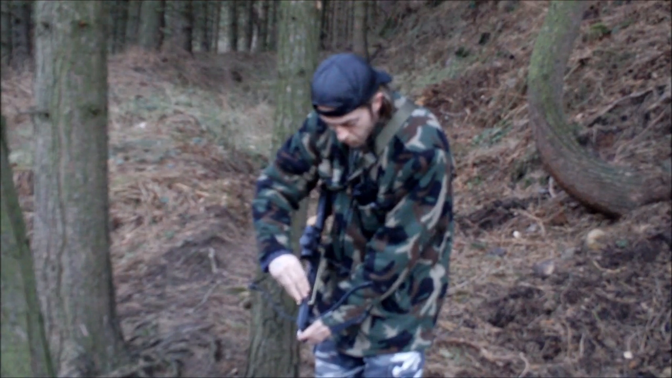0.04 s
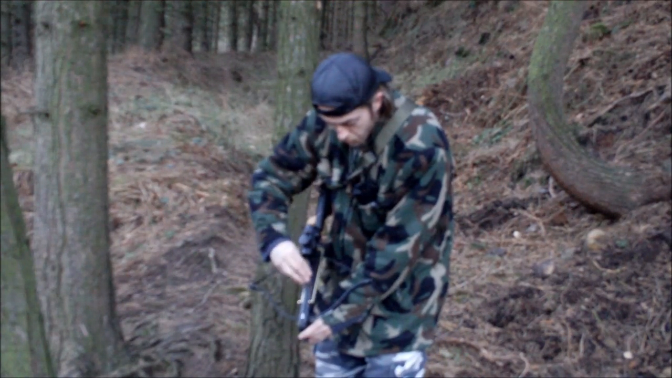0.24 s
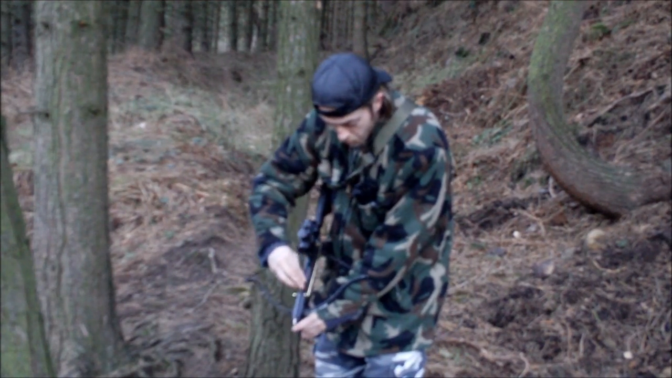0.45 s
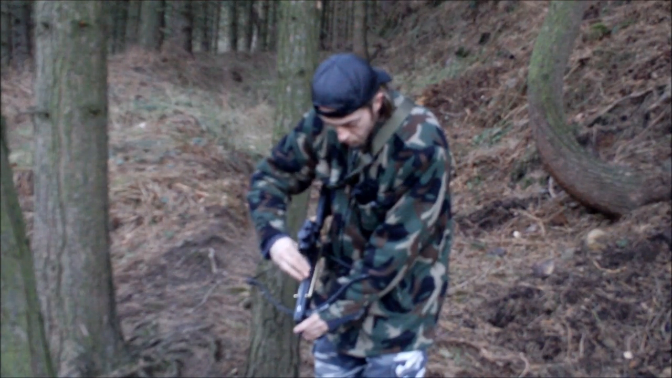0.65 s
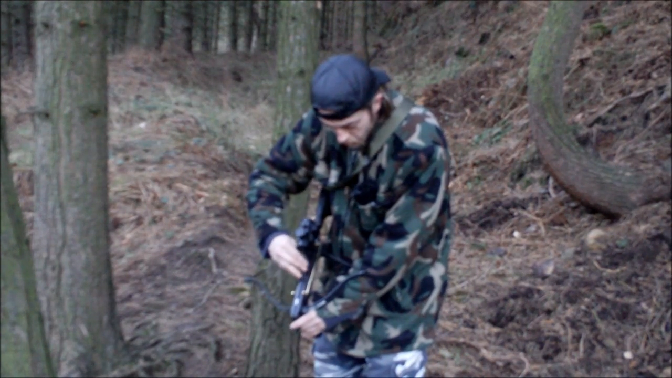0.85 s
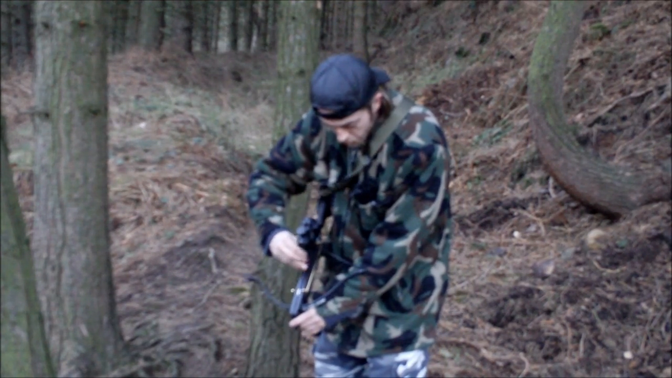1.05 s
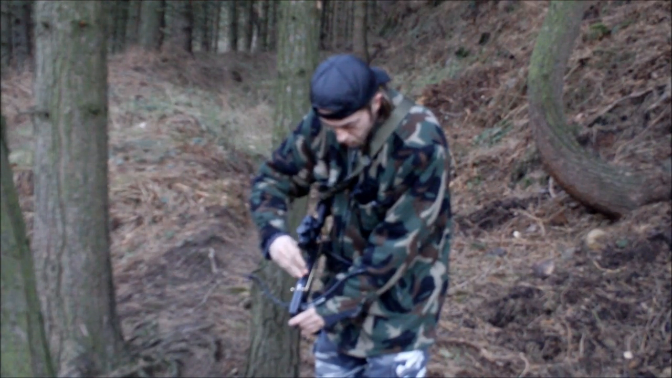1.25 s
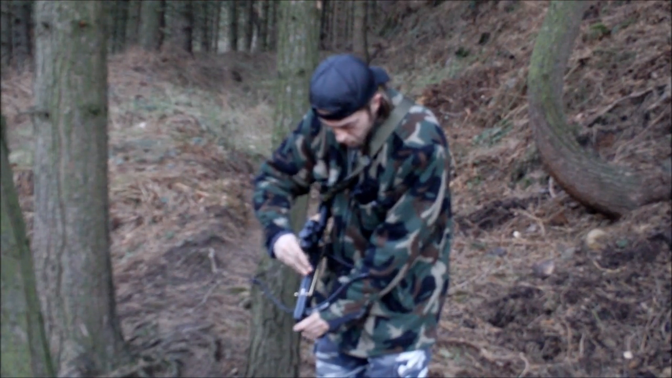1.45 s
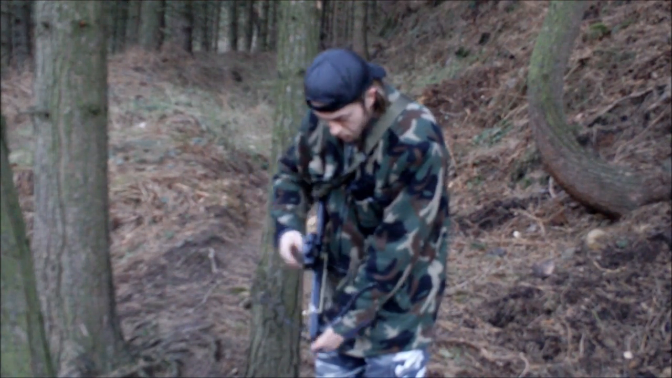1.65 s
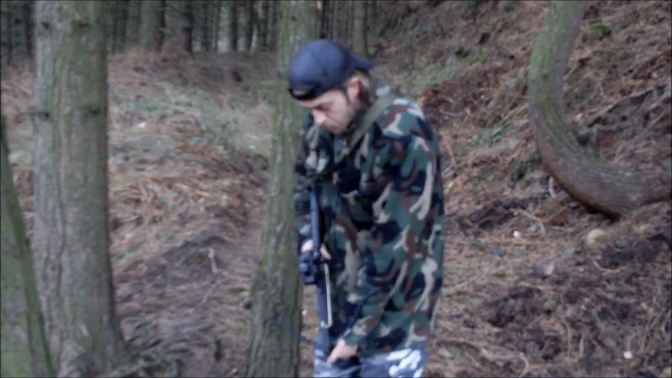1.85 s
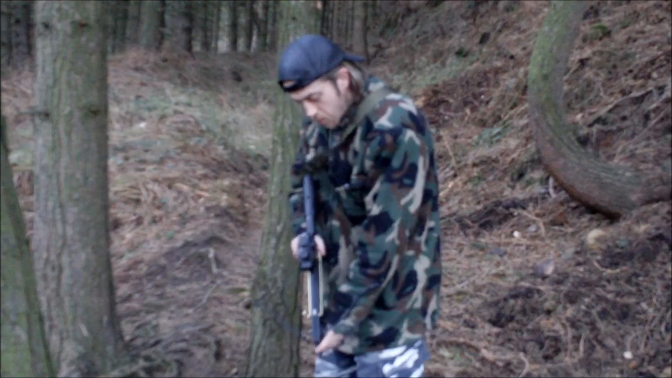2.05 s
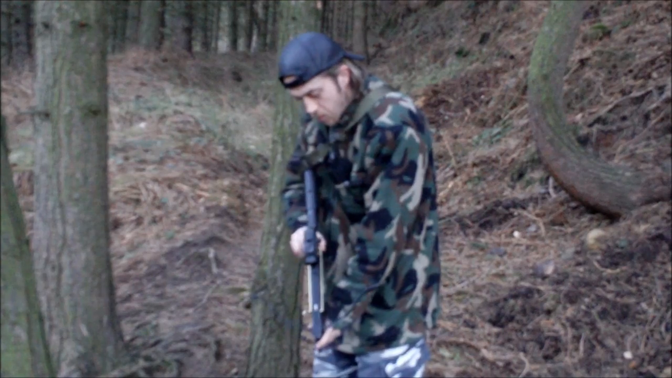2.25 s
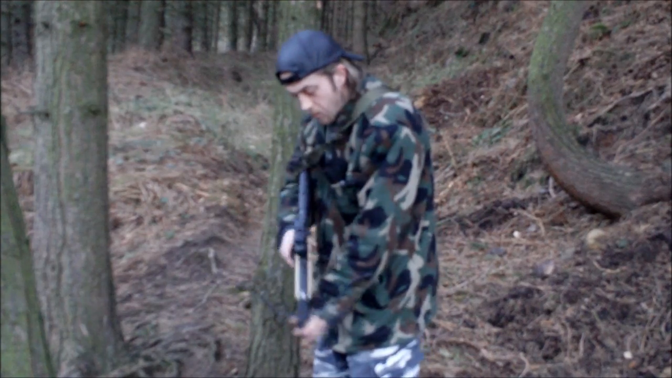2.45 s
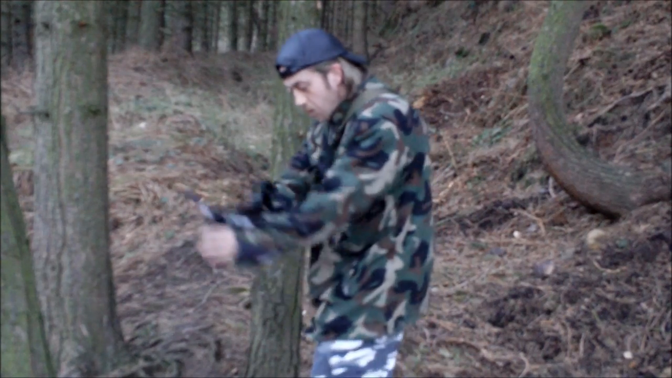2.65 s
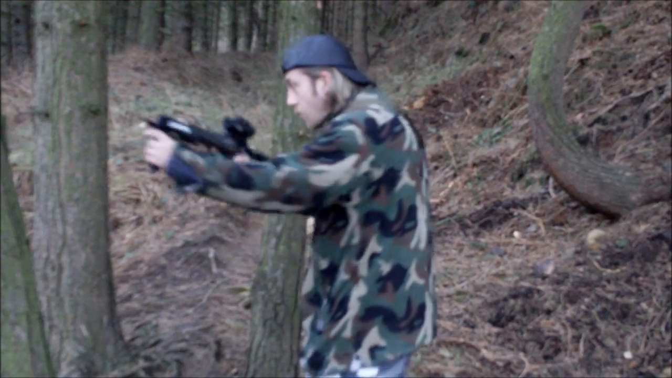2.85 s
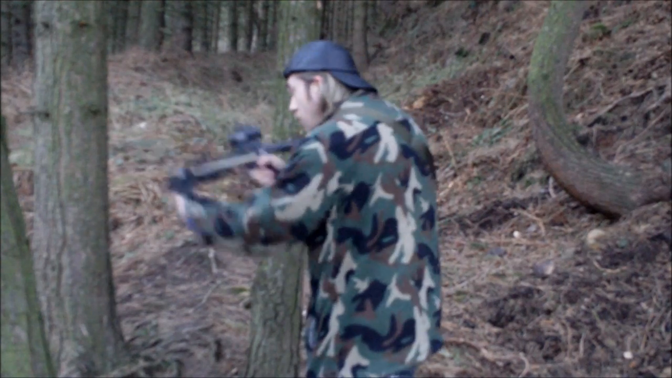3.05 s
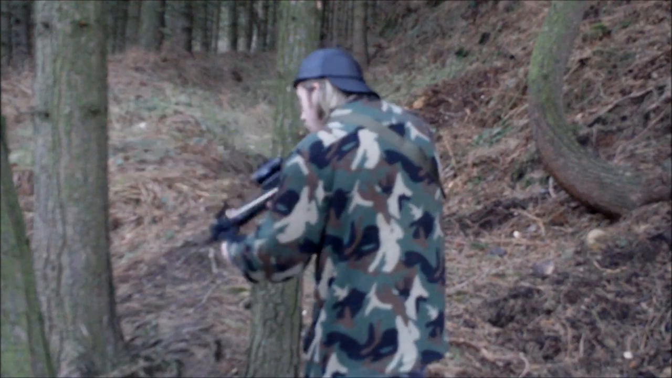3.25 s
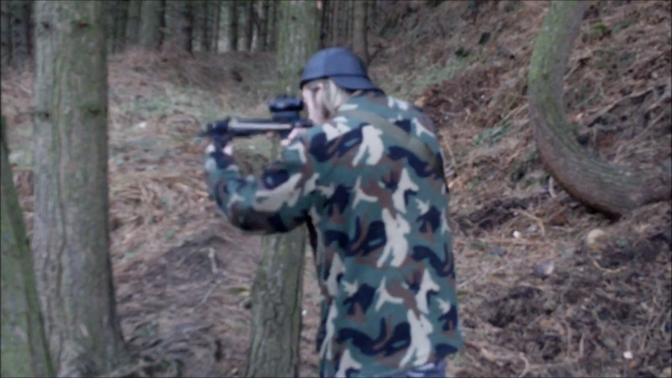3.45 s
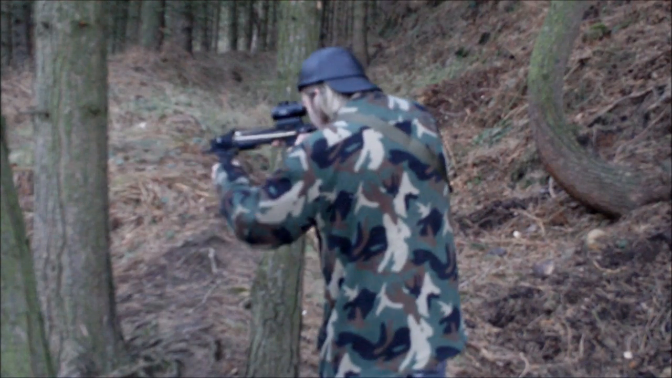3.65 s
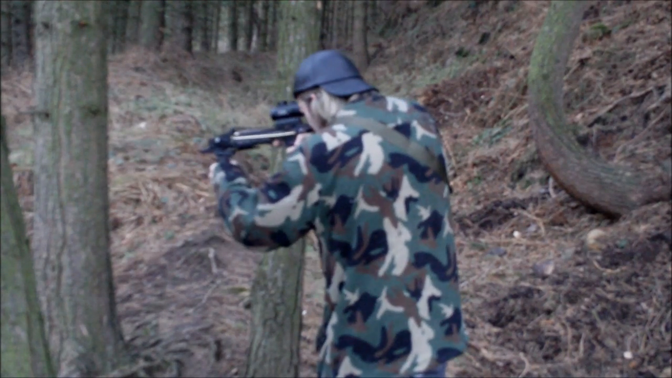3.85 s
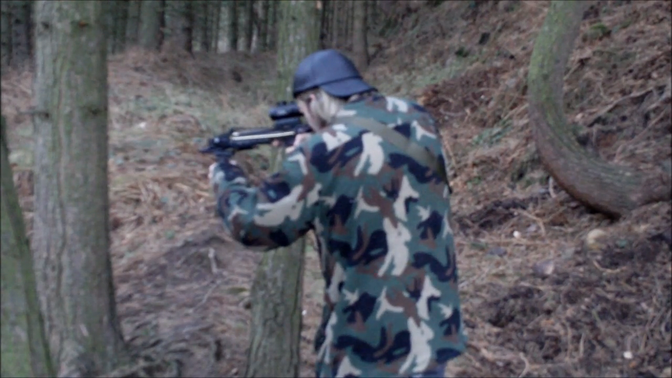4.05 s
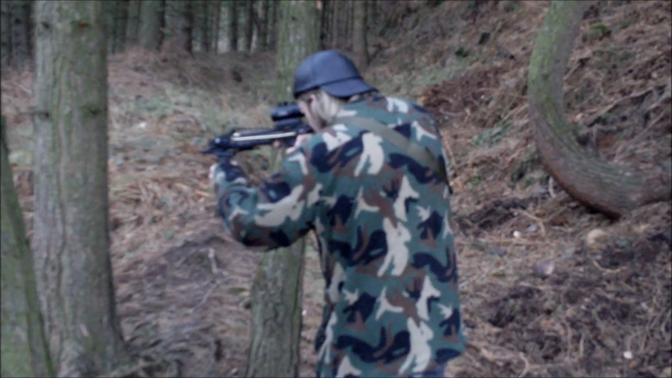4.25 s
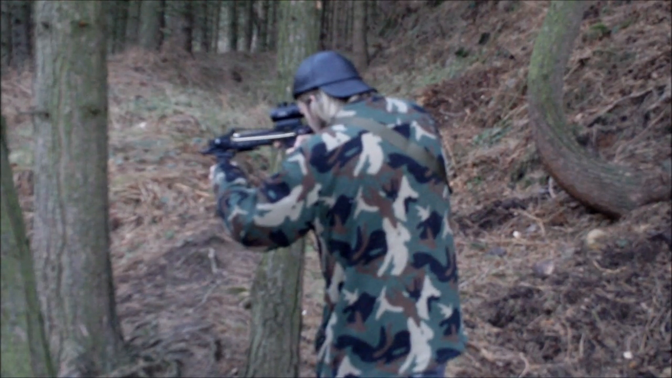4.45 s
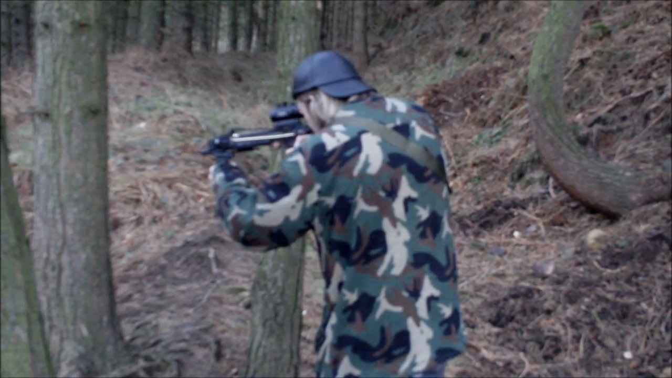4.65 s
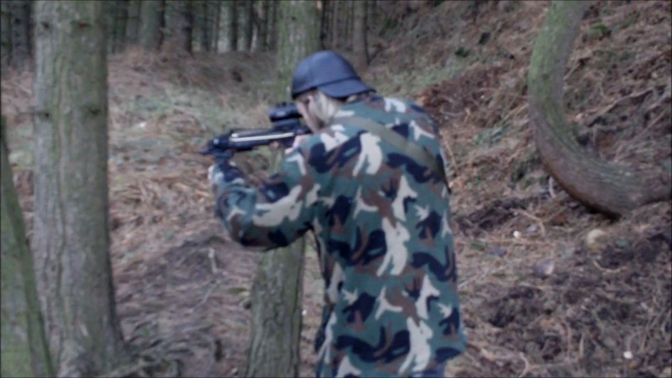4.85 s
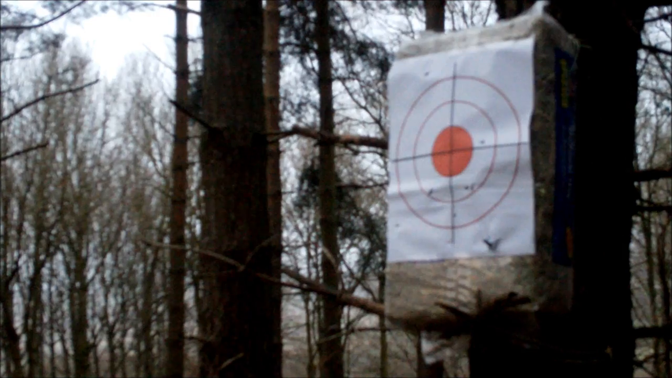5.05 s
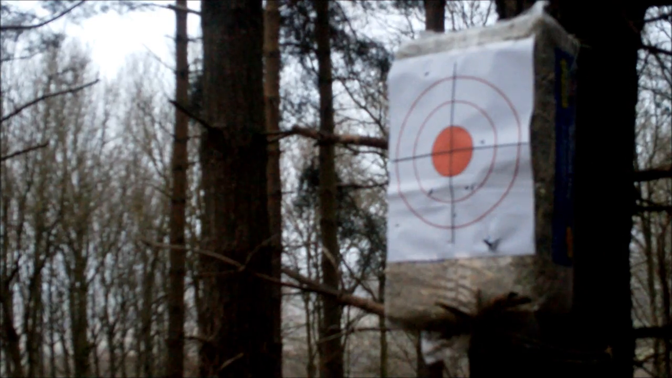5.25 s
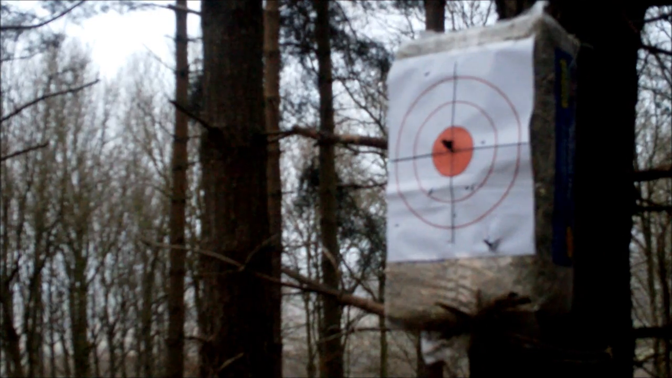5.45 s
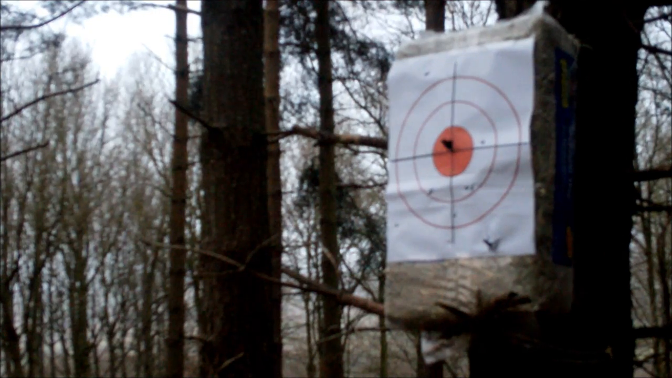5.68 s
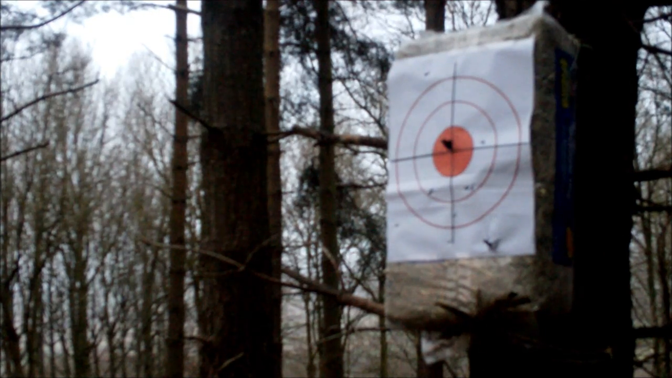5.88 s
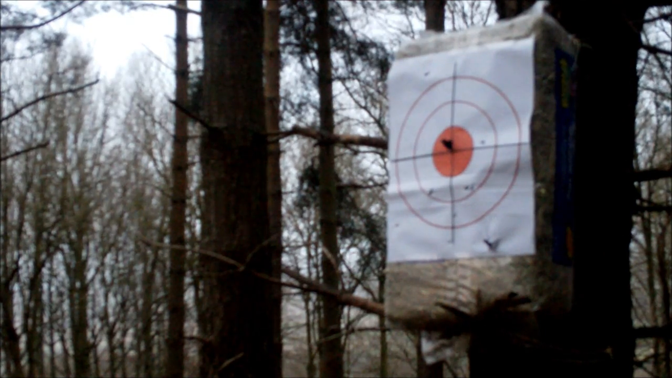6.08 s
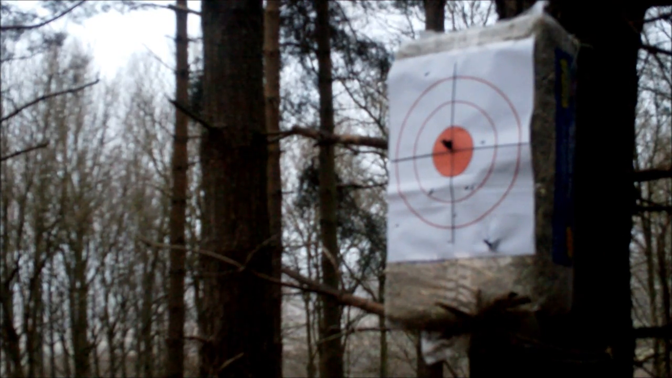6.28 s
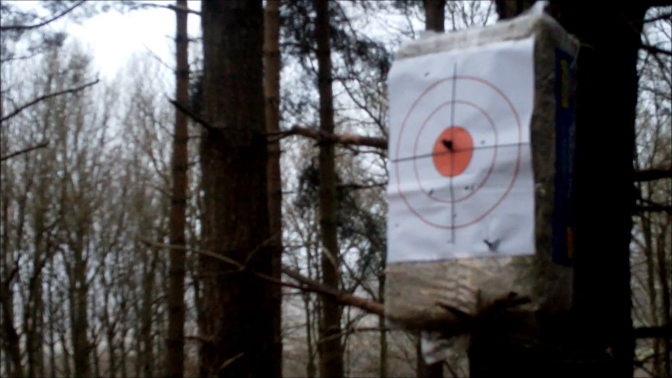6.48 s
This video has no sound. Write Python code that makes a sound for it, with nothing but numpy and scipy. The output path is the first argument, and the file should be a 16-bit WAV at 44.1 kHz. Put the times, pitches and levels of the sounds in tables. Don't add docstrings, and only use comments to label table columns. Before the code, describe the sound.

Soft, steady forest air is heard from a nearby camera microphone. From 0 to 2.6 seconds a crossbow bolt is loaded: light jittering taps at the start, scattered metallic ticks, and short rubs along the groove around 1.0 and 1.6-1.95, with a clearer clink at 2.17. Faint regular focus-motor ticks sit on the right until 1.1, returning at 2.3 and 3.1-3.6. At 2.8-3.0 the jacket rustles and the stock knocks, strongest at 2.9; a small movement follows at 3.3. Near-silence holds until 4.85, when trigger click and string slap burst together with ringing limbs and forest echo. At 4.95 the scene cuts to the target's low drone and hiss. The delayed snap rolls in at 5.0; at 5.29 the bolt smacks papered foam, loud and dry, with a brief rattle and echoes. The background ducks, then slowly recovers as low wind flutters to 6.5.

```python
import sys
import numpy as np
from scipy import signal
from scipy.fft import rfft, irfft, next_fast_len
from scipy.io import wavfile
from scipy.ndimage import uniform_filter1d

SR = 44100
rng = np.random.default_rng(int(sys.argv[2]) if len(sys.argv) > 2 else 0)


def bounce(signal):
    frames = np.transpose(np.atleast_2d(signal))
    limited = np.clip(frames, -1, 1)
    pcm = np.round(limited * 32767).astype(np.int16)
    wavfile.write(sys.argv[1], SR, pcm)


def volts(x):
    e = np.asarray(x, float) / 20
    return 10 ** e


N = 287532
TRAVEL_S = 0.1472

# start_s, level_db, rise_s, length_factor, ring_db
SHOT = [
    (4.845, -24.5, 0.00071, 0.27, -1),
    (4.85, -16, 0.00022, 0.23, 1.5),
    (4.8542, -20, 0.0005, 1.32, -12),
]
# time_s, level_db, contact_ms
SMACK = [
    (5.29047, -8.5, .075),
    (5.2908, -6.5, .075),
    (5.29127, -8.5, .065),
    (5.2928, -20, .15),
]


def unit(x):
    return x / np.sqrt(np.mean(x ** 2) + 1e-20)


def panned(db):
    return volts([[db / 2], [-db / 2]])


def along(points, hz):
    f, v = np.transpose(points)
    return np.interp(np.log(hz + 1), np.log(f + 1), v)


def add(track, s, sound):
    part = track[..., round(s * SR):][..., :sound.shape[-1]]
    part += sound[..., :part.shape[-1]]


def filtered(x, response):
    m = next_fast_len(x.shape[-1] + 8192)
    spectrum = rfft(x, m) * response(np.fft.rfftfreq(m, 1 / SR))
    return irfft(spectrum, m)[..., :x.shape[-1]]


def body(peaks, widen):
    def response(f):
        total = 0
        for k, (centre, width, db) in enumerate(peaks):
            damping = 1j * f * width * widen
            total = total + (-1) ** k * volts(db) * damping / (centre * centre - f * f + damping)
        return total
    return response


def causal(spectrum):
    def response(hz):
        cep = irfft(np.log(volts(along(spectrum, hz)) + 1e-6))
        cep[1:len(cep) // 2] *= 2
        cep[len(cep) // 2 + 1:] = 0
        return np.exp(rfft(cep))
    return response


def port(x):
    low = signal.butter(2, 250, "high", fs=SR, output="sos")
    high = signal.butter(4, 9600, fs=SR, output="sos")
    return signal.sosfilt(np.vstack([low, high]), x)


def ping(hz, t60, attack):
    t = np.arange(SR // 6) / SR
    return np.sin(2 * np.pi * hz * t) * volts(-60 * t / t60) * (1 - np.exp(-t / attack))


def dying(t60s, seconds, channels=1):
    noise = rng.standard_normal((channels, int(seconds * SR)))
    hz, t, z = signal.stft(noise, SR, nperseg=128)
    fade = volts(-60 * t / along(t60s, hz)[:, None])
    tail = signal.istft(z * fade, SR, nperseg=128)[1]
    return tail / np.linalg.norm(tail[0])


def grit(per_s, spread_db):
    when, size, sign = rng.random((3, N))
    strength = volts(-spread_db * np.log(size + 0.06))
    return unit((when < per_s / SR) * strength * (sign - 0.5))


def slips(count, centre_hz, spread, cycles):
    when = rng.random(count)
    pitch = rng.standard_normal((count, 1))
    size = np.minimum(rng.exponential(size=(count, 1)), 2.5)
    hz, k = centre_hz * np.exp(spread * pitch), np.arange(320)
    rings = volts(4 * size - 60 * k / SR * hz / cycles) * np.sin(2 * np.pi * hz * k / SR)
    places = (when * N).astype(int)[:, None] + k
    return unit(np.bincount(places.ravel(), rings.ravel())[:N])


def strokes(rows, rise_db, fall_db_per_s):
    t = np.arange(N) / SR
    start, attack, hold, db = np.transpose(rows)[..., None]
    rising = rise_db * (start + attack - t) / attack
    falling = fall_db_per_s * (t - start - attack - hold)
    below = np.maximum(rising, falling)
    return volts((db - np.clip(below, 0, 120)).max(axis=0))


def rush(spectrum, alike, patchy_db):
    z = signal.stft(rng.standard_normal((2, N)), nperseg=512)[2]
    patches = rng.standard_normal(z.shape[1:])
    patches = uniform_filter1d(uniform_filter1d(patches, 6, 0), 10, 1)
    pair = signal.istft(z * volts(patchy_db * unit(patches)), nperseg=512)[1][:, :N]

    def mid_side(hz):
        turn = np.arccos(np.clip(along(alike, hz), -1, 1)) / 2
        return volts(along(spectrum, hz)) * [np.cos(turn), np.sin(turn)]
    mid, side = filtered(pair, mid_side)
    return unit(np.array([mid + side, mid - side]))


def forest(x, near_db):
    trees = [(300, 0.47), (2000, 0.83), (8000, 0.43), (14000, 0.33)]  # pitch_hz, t60_s
    ahead, around = dying(trees, 1.0, channels=2)
    swell = 1 + volts(near_db - 60 * np.arange(len(ahead)) / SR / 0.17)
    ahead, around = ahead * swell, around * swell
    left, right = ahead + 0.052 * around, ahead - 0.11 * around
    return signal.fftconvolve(x[None], [left, right], axes=1)[:, :N]


def hush():
    hush_near = [(18, -64), (30, -34), (81, -23.5), (266, -7), (345, -3.5), (415, -2.5), (937, 0),
                 (1500, -1), (2350, -2.5), (4780, -8), (6900, -14), (8300, -11), (12300, -26), (16000, -52)]
    alike_near = [(60, 1.0), (240, 0.98), (950, 0.96), (3770, 0.8), (15000, 0.82)]  # pitch_hz, left-right likeness (0 to 1)
    return volts(-60.5) * rush(hush_near, alike_near, patchy_db=0.9)


def gain_control():
    open_db_per_s, duck_db, duck_s, recover_db_per_s = 11, 9.5, 0.14, 4
    since = np.arange(N) / SR - SMACK[0][0]
    after = np.maximum(since, 0)
    opening = open_db_per_s * np.minimum(since + 0.15, 0)
    return opening - duck_db * np.clip(after / duck_s, 0, 1) + recover_db_per_s * after


def target_air():
    drone = [(18, -57.5), (30, -23), (75, -18.5), (178, -8.5), (350, -5.5), (476, -6), (731, 0.5),
             (1440, -3.5), (1690, -7.5), (4000, -22.5), (5200, -54), (8800, -120)]
    hiss = [(1180, -31), (2000, -4.5), (2380, -11), (3680, -14.5), (4770, -14), (7190, -20), (8050, -17),
            (12200, -31.5), (13200, -50), (16000, -48)]
    gain_db = gain_control()
    low = volts(-53.5 + gain_db) * rush(drone, [(300, 0.94), (2000, 0.99)], patchy_db=1.0)
    high = volts(-64.5 + gain_db) * rush(hiss, [(3000, 0.7), (9000, 0.9)], patchy_db=-1.0)
    return low + high


def gusts():
    # time_s, level_db, pitch_hz
    thumps = [(5.1565, -44, 322), (5.1675, -38, 283.3), (5.3702, -47, 419), (5.4385, -41.5, 324),
              (5.4454, -46, 387), (5.61, -46, 333), (5.66, -41, 286), (5.6718, -38, 581), (5.682, -45, 320),
              (5.724, -49, 549), (5.871, -40, 329), (5.876, -43.5, 342), (5.9212, -43, 367),
              (5.9475, -49.5, 298), (5.959, -41, 452), (6.0464, -43, 318), (6.0728, -49, 333),
              (6.1456, -46, 590), (6.15, -38.5, 419), (6.1661, -45.5, 290), (6.2371, -46, 516),
              (6.2448, -43, 385), (6.2539, -37.5, 457), (6.269, -34, 520), (6.5021, -31, 323),
              (6.5175, -45, 387)]
    # start_s, attack_s, hold_s, level_db
    swells = [(5.02, 0.13, .01, -53), (5.33, 0.16, 0.0091, -58), (5.5, 0.2, 0.0058, -48.5),
              (5.74, 0.13, .015, -49.5), (6.02, 0.031, 0.032, -51), (6.1, 0.17, .015, -49.5),
              (6.46, 0.047, .02, -46)]
    rumble = [(30, -47), (100, -4.5), (250, 6), (450, 0), (900, -10.5), (2500, -66), (6000, -120)]  # pitch_hz, level_db (per Hz)
    out, t = np.zeros(N), np.arange(-600, 600) / SR
    for s, db, hz in thumps:
        phase = 2 * np.pi * rng.random(2)[:, None]
        bump = np.exp(-(t * hz / np.where(t < 0, 0.55, 0.9)) ** 2)
        eddy = np.cos(2 * np.pi * hz * t * [[1], [2.1]] + phase) * bump
        add(out, s - 600 / SR, volts(db - 3.5) * (eddy[0] + 0.35 * eddy[1]))
    lumps = unit(filtered(grit(350, 4.6), causal(rumble)))
    return out + volts(-6.5) * strokes(swells, rise_db=16.5, fall_db_per_s=400) * lumps


def focus():
    steps = [(0.095, -37.5), (0.23, -37.5), (0.3693, -37), (0.5065, -36.5), (0.6455, -34.5), (0.7857, -34),
             (0.9251, -32.5), (1.071, -33.5), (2.315, -34), (3.061, -34.5), (3.1981, -34), (3.3346, -36),
             (3.4745, -33), (3.613, -34)]
    out, t = np.zeros(N), np.arange(-10, SR // 200) / SR
    push = np.exp(-(t / np.where(t < 0, 0.00006, 0.00013)) ** 2)
    rebound = np.exp(-((t - 0.00055) / 0.00044) ** 2)
    tick = push - rebound * push.sum() / rebound.sum()
    for s, db in steps:
        add(out, s - 10 / SR, volts(db - 0.7) * tick)
    return out * volts([[-20.5], [0]])


def loading():
    # time_s, peak_db, ring_hz, treble_db, t60_s
    ticks = [(0.0098, -39.5, 3100, 7, 0.016), (0.2995, -43, 1930, -31, 0.034), (0.3, -48, 2700, -31, 0.013),
             (0.634, -52, 2630, -1.5, 0.04), (0.7305, -41, 2215, -30, 0.04),
             (0.7345, -47, 2300, -30, 0.027), (0.7365, -48, 3350, -30, .02), (0.74, -47, 1870, -30, .03),
             (0.8556, -49.5, 2350, -17, 0.055), (1.0415, -44, 3730, -13, .03), (1.054, -45, 2000, -16, .05),
             (1.6268, -38, 1920, -36, 0.023), (1.6272, -59, 3010, -30, 0.018),
             (1.6552, -44, 2000, -30, .05), (1.667, -47, 1360, -30, 0.068), (1.735, -46, 2140, -20, .04),
             (1.766, -48, 2800, -17, .017), (1.8894, -44.5, 5300, -8, 0.014),
             (1.8896, -42.5, 2080, -13, 0.083), (1.8918, -43, 3500, -17, .02),
             (1.8975, -49, 3000, -20, .015), (1.9101, -39, 2920, -17, 0.0089),
             (1.9124, -41, 2430, -30, .04), (1.9128, -46, 3100, -30, 0.022), (1.92, -49, 3270, -30, 0.018),
             (1.9266, -38, 2450, -40, 0.0083), (1.929, -47, 2070, -40, 0.037),
             (2.0355, -39, 2260, -22, 0.017), (2.0358, -46, 3680, -26, 0.064),
             (2.1035, -50.5, 2660, 3, .02), (2.168, -33, 2645, -12, 0.027), (2.1704, -30, 2610, -23, 0.019),
             (2.3624, -46, 2900, -28, .02), (2.3635, -44, 1970, -28, 0.019),
             (2.5608, -49.5, 2800, -13, 0.044), (2.9125, -51, 5500, -20, .012),
             (2.919, -39.5, 3100, -30, 0.012), (3.0272, -46, 4660, -14, 0.004),
             (3.0276, -49, 3200, -30, .006)]
    # time_s, peak_db
    drops = [(0.008, -48), (0.021, -44), (0.0298, -47), (0.0378, -48), (0.0518, -49.5), (0.063, -53)]
    # time_s, left_minus_right_db
    bearing = [(0, 4.5), (.65, 2), (1.63, 0), (1.92, -0.3), (2.56, 2), (2.92, 6)]
    # start_s, attack_s, hold_s, level_db
    slide = [(0, .001, .065, -75), (1.0, 0.042, .012, -59.5), (1.59, 0.07, 0.078, -57),
             (1.84, 0.065, 0.033, -56), (1.93, 0.016, 0.023, -58.5)]
    # pitch_hz, width_hz, level_db
    bolt, rail, groove = [(1970, 300, -5), (2550, 130, 7.5), (3100, 530, 8.5), (3860, 280, -3),
                          (4450, 580, -4.5)], [(4500, 350, -19), (5600, 770, -6.5), (8500, 1400, -0.5),
                                        (10000, 1900, 0)], [(1275, 43, 4), (1950, 192, -0.5), (2420, 112, 0.5),
                                                      (3010, 110, 2), (4060, 280, -14)]
    out, t = np.zeros((2, N)), np.arange(SR // 10) / SR
    jitter = [(s, db, 2960, 2, 0.013) for s, db in drops]
    for s, db, hz, treble_db, t60 in jitter + ticks:
        pan_db = np.interp(s, *np.transpose(bearing))
        chatter = rng.standard_normal((2, len(t))) * volts(-60 * t / (t60 * np.array([[0.9], [0.6]])))
        rough = filtered(chatter[0], lambda f: body([(hz, 400, 0)], 1)(f) ** 2 + 0.31 * body(bolt, 1)(f))
        ring = ping(hz, 0.73 * t60, 0.0001)[:len(t)] + rough / abs(rough).max()
        treble = filtered(chatter[1], body(rail, widen=1.0))
        touch = ring / abs(ring).max() + volts(treble_db) * treble / abs(treble).max()
        add(out, s, panned(pan_db) * volts(db - 0.5) * touch)
    rub = unit(filtered(grit(1500, 2.4), body(groove, widen=0.85)))
    rub = 0.69 * rub + 0.84 * slips(count=4000, centre_hz=2240, spread=0.24, cycles=23)
    return out + strokes(slide, rise_db=10, fall_db_per_s=196) * rub


def raising():
    # start_s, attack_s, hold_s, level_db
    sleeve = [(2.815, 0.022, .005, -57), (2.868, 0.013, 0.045, -53), (2.94, .01, 0.024, -58.5),
              (2.98, 0.021, .003, -58), (3.3, 0.04, 0.013, -63.5)]
    cloth = [(88, -59), (150, -35), (286, -4), (690, 6.5), (847, -1), (1030, 1), (1520, -1), (5000, -16),
             (6500, -48), (11000, -120)]
    # time_s, level_db, pitch_hz, left_minus_right_db, length_cycles
    knocks = [(2.1683, -41, 1150, 7, 12), (2.5616, -45, 1200, .2, 7.8), (2.8315, -44.5, 490, 0, 2.7),
              (2.843, -46, 750, 0, 5), (2.877, -46, 700, 0, 6), (2.9126, -27, 690, -16.5, 1.6),
              (2.9188, -34, 990, 0, 8.3), (2.937, -30, 1050, 3.5, 3), (3.008, -45, 620, 4, 6),
              (3.348, -50, 570, 1, 8.1)]
    rustle = unit(filtered(grit(4000, 2.5), causal(cloth)))
    out = strokes(sleeve, rise_db=20, fall_db_per_s=350) * rustle * np.ones((2, 1))
    for s, db, hz, pan_db, cycles in knocks:
        knock = ping(hz, cycles * 2 / hz, 0.0001) + 0.6 * ping(2.0 * hz, cycles / hz, 0.0001)
        add(out, s, -volts(db - 1.5) * panned(pan_db) * knock)
    return out


def crossbow():
    limbs = [(452, -21.5, 0.15), (965, -4.5, 0.093), (1385, -6.5, .06), (1980, -9, .07), (2180, -4.5, 0.1),
             (2450, -6, 0.065), (2700, 4.5, 0.044), (3046, 4, 0.051), (3567, -3, .07), (3820, -9, 0.066),
             (4760, -11, .08), (5400, -15, .07), (7640, -2, 0.056), (9740, -16, .06)]
    rattle_tone = [(35, -78), (60, -64), (423, -11.5), (602, -20), (942, -12.5), (1820, -10.5), (2990, -2),
                   (3280, -17), (3690, -5), (4560, -14), (6800, -17.5), (7650, -11.5), (9460, -12.5),
                   (14000, -33), (15500, -33), (16600, -59)]
    rattle_t60 = [(300, 0.062), (1000, 0.068), (3000, 0.067), (6000, 0.085), (12000, 0.033)]  # pitch_hz, t60_s
    # time_s, level_db, pitch_hz, t60_s
    sear = [(4.8461, -26, 10500, .004), (4.8502, -21.5, 5600, .005), (4.8555, -24, 8200, .005),
            (4.857, -28, 8800, 0.0046)]
    ring, rattle, t = np.zeros(N), np.zeros(N), np.arange(SR // 6) / SR
    for s, db, rise, length, ring_db in SHOT:
        onset = 1 - np.exp(-t / rise)
        shake = np.cumsum(rng.standard_normal((len(limbs), len(t))), axis=1) * 0.022
        modes = 0
        for (hz, level, life), drift in zip(limbs, shake):
            fade = volts(level - 60 * t / (0.9 * life))
            modes = modes + fade * np.sin(2 * np.pi * hz * t + drift * hz / 2500)
        add(ring, s, volts(db + ring_db - 12.0) * modes * onset)
        noise = dying([(hz, t60 * length) for hz, t60 in rattle_t60], 1 / 6)[0, :len(t)]
        add(rattle, s, volts(db + 29) * noise * onset)
    for s, db, hz, t60 in sear:
        add(ring, s, volts(db) * ping(hz, t60, 0.0001))
    return port(ring) + filtered(rattle, causal(rattle_tone))


def sideways(bow):
    stock = [(550, 410, -15), (1100, 660, -16)]  # pitch_hz, width_hz, level_db
    before_slap = np.arange(N) < 4.8495 * SR
    side = filtered(np.roll(bow, 20), body(stock, widen=1.1)) + 0.15 * np.roll(bow, 9) * before_slap
    add(side, SHOT[0][0], volts(-36) * port(ping(270, 0.045, 0.004)))
    return side


def roll():
    scattered = [(180, -47), (300, -16), (658, -17), (928, 1.5), (1110, -8.5), (3980, -11), (5620, -21),
                 (7420, -13.5), (15000, -48)]
    click = 1.0 * (np.arange(N) == round((SHOT[1][0] + TRAVEL_S) * SR))
    slap = filtered(click, causal(scattered))
    return volts(-18) * forest(slap / np.linalg.norm(slap), near_db=3.0)


def distant_snap(snap):
    distance = [(100, -4.5), (500, -14), (950, 2.5), (1600, -3), (2800, -9.5), (3600, -11), (4600, 3),
                (5600, -13), (6400, 1), (7000, 6), (7600, -4.5), (9000, -18), (15000, -11)]
    late = filtered(np.roll(snap, round(TRAVEL_S * SR)), causal(distance))
    return volts(-13.0) * late + volts(-15.5) * forest(late, near_db=1.0) + roll()


def smack():
    block = [(783, 100, 10.5), (1330, 430, -19), (1900, 120, 16), (2560, 250, -10), (3520, 1000, 16),
             (5150, 410, -10), (6340, 130, -22), (7560, 190, -27), (8810, 200, -19)]
    # pitch_hz, level_db (per Hz)
    crack, paper = [(2650, -29), (4500, -13), (5220, 2), (6670, -7), (8870, -9.5), (10000, -19),
                    (11500, -18), (16600, -46)], [(35, -59), (60, -51), (330, 4.5), (560, -1), (1040, 1), (1550, -5),
                                   (1860, -6), (2410, 0.5), (4420, -12), (5090, -6.5), (10000, -17.5),
                                   (16000, -58)]
    paper_t60 = [(200, 0.056), (350, 0.039), (700, 0.024), (2000, 0.026), (5000, 0.021), (12000, 0.024)]  # pitch_hz, t60_s
    trunks = [(.012, -41), (0.0188, -35), (.0245, -41), (.0275, -48)]
    aside = [(60, -6), (250, -9), (550, -15), (1200, -7), (2200, -17), (4500, -16), (7000, -6), (12000, -7)]
    tip_s, stop_s = SMACK[0][0], SMACK[1][0]
    hit, rattle, t = np.zeros(N), np.zeros(N), np.arange(-40, 40) / SR
    for k, (s, db, ms) in enumerate(SMACK):
        sign = -1 if k == 1 else 1
        add(hit, s - 40 / SR, sign * volts(db) * np.exp(-(t * 1000 / ms) ** 2))
    foam = volts(-17.5) * filtered(hit, body(block, widen=0.98))
    shaft = 0.39 * filtered(hit, body([(4950, 870, 11), (2800, 800, -5.0)], 1.0))
    hit = port(hit + foam + shaft)
    tear = rng.standard_normal(300) * volts(-60 * np.arange(300) / SR / 0.0031)
    add(hit, tip_s, volts(-7) * filtered(tear, causal(crack)))
    add(hit, stop_s, volts(-39) * ping(14800, 0.0015, 0.00005))
    add(rattle, stop_s, volts(5.0) * dying(paper_t60, 0.2)[0])
    add(rattle, stop_s, volts(-38.5) * ping(354, 0.061, 0.001))
    dull = filtered(hit, lambda f: 1 / (1 + 1j * f / 1700) ** 3)
    echoes = sum(volts(db + 2) * np.roll(dull, round(s * SR)) for s, db in trunks)
    front = hit + port(filtered(rattle, causal(paper)))
    wide = front + filtered(front, causal(aside)) * [[1], [-1]]
    return wide + echoes * panned(2.6) + volts(-30.0) * forest(dull + 0.39 * hit, near_db=-4.0)


def scene():
    t = np.arange(N) / SR
    bow = crossbow()
    snap = bow * volts(-60 * np.maximum(t - SHOT[1][0], 0) / 0.009)
    echoed = filtered(snap, lambda f: 1 - 0.47 * body([(3000, 1500, 0)], 1)(f))
    handling = port(loading() + raising())
    shot = bow + sideways(bow) * [[1], [-1]] + volts(-11) * forest(echoed, near_db=-7.0)
    near = hush() + focus() + handling + shot
    far = (target_air() + gusts()) * panned(1.5) + distant_snap(snap) * panned(3) + smack()
    change_s = 4.954
    return far + (near - far) * np.clip((change_s + 0.0026 - t) / 0.0033, 0, 1)


def low_pass(x):
    return signal.sosfilt(signal.butter(12, 16790, fs=SR, output="sos"), x)


def record(dry):
    return low_pass(dry)


dry = scene()
out = record(dry)
bounce(out)
```